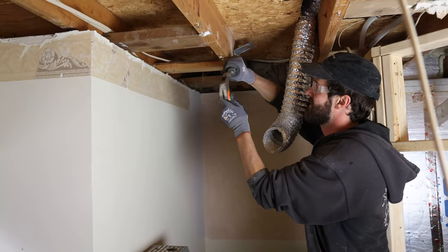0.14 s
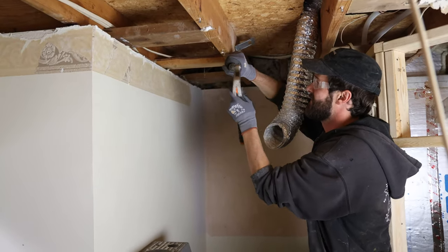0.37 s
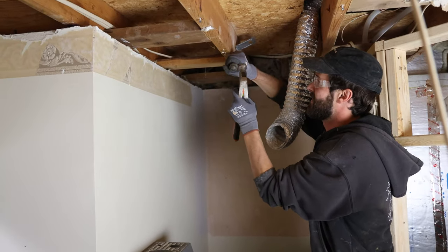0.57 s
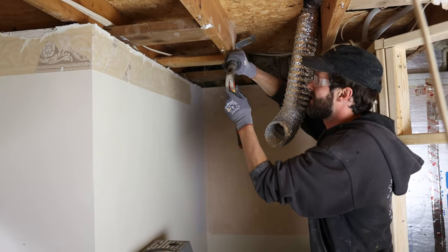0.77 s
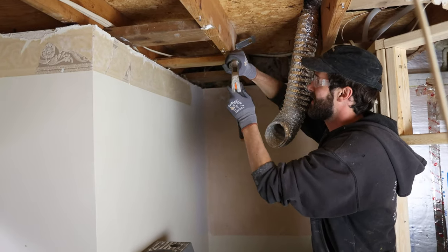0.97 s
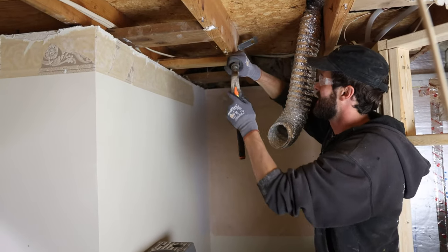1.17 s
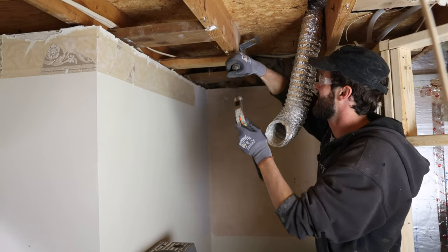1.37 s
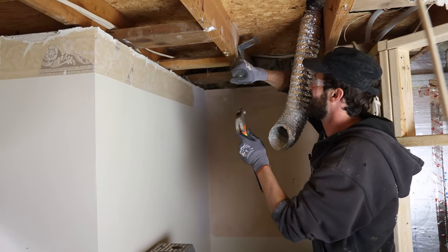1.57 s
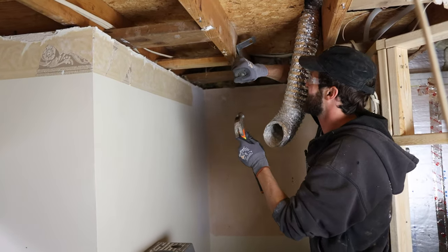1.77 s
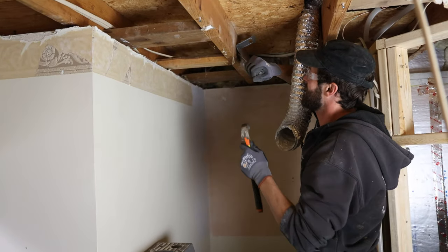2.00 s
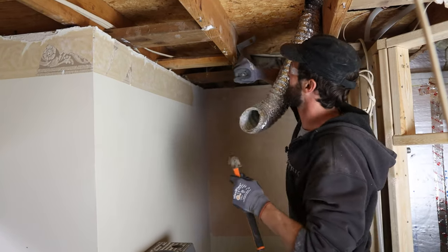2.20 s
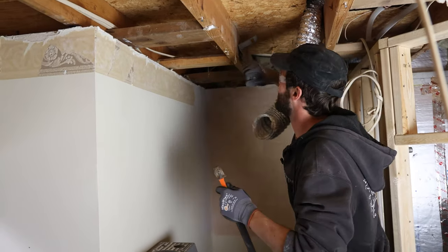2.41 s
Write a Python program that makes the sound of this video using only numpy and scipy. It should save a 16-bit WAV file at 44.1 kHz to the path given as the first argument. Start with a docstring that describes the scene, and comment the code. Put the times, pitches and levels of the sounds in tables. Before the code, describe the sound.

A hammer strikes a sheet metal housing in a small bare room. After the fading ring of an earlier hit, blows land at about 0.2, 0.5, 0.8 and 1.1 seconds, each a clattering crack with a wooden thump. A clear tone and faint low drone linger until damped near 1.8 seconds. From 1.6 to 2.4 seconds come soft knocks and light metal clicks, with a brief sleeve rustle around 2.1.

```python
"""A hammer strikes a sheet metal fan housing between ceiling joists, in a bare small room.
About three times a second a blow cracks, clatters through the sheet and thumps the joists;
one clear tone and a low drone ring on between blows. Then the hammering stops and the ring is damped.
Light clicks, soft knocks and a rustle follow as the hands come away."""
import sys
import numpy as np
from scipy import signal
from scipy.fft import rfft, irfft
from scipy.io import wavfile
from scipy.ndimage import uniform_filter1d

SR = 44100
rng = np.random.default_rng(int(sys.argv[2]) if len(sys.argv) > 2 else 0)


def store_pcm(level_fs):
    """Save levels as 16-bit WAV."""
    pcm = np.round(np.clip(level_fs, -1, 1) * 32767).astype(np.int16)
    wavfile.write(sys.argv[1], SR, np.atleast_2d(pcm).T)


N = 108045
BAND_HZ = np.geomspace(28, 18000, 24)[:, None]  # noise band centres, one a row
MODE_RISE_S, PARTIAL_RISE_S = .0024, .0043


def amp(db):
    """Decibels to gain."""
    return 10 ** (np.asarray(db) / 20)


def read(table, hz, column=1):
    """One column of a table, interpolated on a log-frequency axis."""
    points = np.array(table, float)
    return np.interp(np.log(hz), np.log(points[:, 0]), points[:, column])


def add(mix, start_s, sound):
    """Mixes a sound in, trimming what falls outside the mix."""
    at = round(start_s * SR)
    sound = sound[max(-at, 0):]
    part = mix[max(at, 0):][:len(sound)]
    part += sound[:len(part)]


def noise_bands(size):
    """White noise split into narrow bands of rms 1."""
    log_hz = np.log(np.fft.rfftfreq(size, 1 / SR) + 1)
    shares = np.array([np.interp(log_hz, np.log(BAND_HZ[:, 0]), row) for row in np.eye(len(BAND_HZ))])
    bands = irfft(rfft(rng.standard_normal(size)) * shares * (log_hz > np.log(20)), size)
    return bands / bands.std(1, keepdims=True)


def struck(t, rise, t60):
    """A quick attack and an exponential decay."""
    return (1 - np.exp(-(t / rise) ** 2)) * np.exp(-np.log(1000) * t / t60)


def shaped(bands, envelopes):
    """Sums the bands, each holding the energy of its envelope."""
    bursts = bands * envelopes
    trim = np.sqrt((envelopes ** 2).sum(1) / (bursts ** 2).sum(1))
    return (bursts * trim[:, None]).sum(0)


def ringing(modes, t, rise):
    """Decaying sines, all pushed the same way by one impact; close ones beat."""
    return sum(amp(db) * struck(t, rise, t60) * np.sin(2 * np.pi * hz * t) for hz, db, t60 in modes)


# bed of quiet air (frequency [Hz], level [dB])
ROOM_BED = [(30, -87), (65, -71.5), (130, -78), (250, -78.5), (500, -74), (1300, -76.5), (2500, -81.5),
            (6000, -85), (15000, -91.5)]
def room_tone():
    """Steady faint air of the room."""
    return (noise_bands(N) * amp(read(ROOM_BED, BAND_HZ))).sum(0)


# swell of the sliding cloth (time [s], level [dB])
RUSTLE_FADER = [(0, -92), (1.87, -87), (1.94, -79), (2.03, -57), (2.09, -56.5), (2.15, -65.5),
                (2.249, -73.5), (2.45, -73.5)]
# its tone colour (frequency [Hz], relative level [dB])
RUSTLE_EQ = [(100, -27), (500, -12.5), (1150, -3.5), (2200, -10.5), (4000, 3), (7500, -2), (10500, 3),
             (15000, 9)]
def rustle(grain_db=1.5):
    """Sleeve and glove slide with a grainy hiss."""
    hiss = (noise_bands(N) * amp(read(RUSTLE_EQ, BAND_HZ))).sum(0)
    grain = uniform_filter1d(rng.standard_normal(N), size=300)
    fader_db = np.interp(np.arange(N) / SR, *np.transpose(RUSTLE_FADER))
    return hiss / hiss.std() * amp(fader_db + grain_db * grain / grain.std())


# knock cues (time [s], level [dB], centre [Hz], t60 [s])
KNOCK_CUES = [(1.632, -57.5, 380, 0.22), (1.672, -57, 365, 0.11), (1.76, -56, 372, 0.053),
              (1.91, -56, 420, 0.083), (2.155, -62, 1405, 0.17), (2.266, -56, 1060, 0.051),
              (2.283, -49, 716, 0.096), (2.291, -56.5, 152, 0.12), (2.372, -56.5, 520, 0.11)]
def knocks(rise_s=.0049, slope_db_per_octave=11.5, tone_db=3):
    """Hand and tool bump softly: a hollow tone inside a dull puff of noise."""
    out, t = np.zeros(N), np.arange(SR // 2) / SR
    for start, db, centre, t60 in KNOCK_CUES:
        colour = amp(db - slope_db_per_octave * abs(np.log2(BAND_HZ / centre)))
        hollow = ringing([(centre, db + tone_db, t60)], t, rise_s)
        puff = shaped(noise_bands(len(t)), colour * struck(t, rise_s, t60))
        add(out, start, hollow + puff)
    return out


# click cues (time [s], level [dB], t60 [s], treble shelf [dB], ring send [dB])
CLICK_CUES = [(1.680, -43, 0.074, -16.5, -24), (2.0972, -42, 0.052, 6, -1), (2.287, -57.5, 0.071, -12, -4),
              (2.446, -49.5, 0.051, -23, -14)]
# their tone colour (frequency [Hz], relative level [dB])
CLICK_EQ = [(35, -45), (80, -4), (200, -46), (600, -15), (1600, -13.5), (2300, -17), (4200, -10),
            (7000, -7), (10000, -4.5), (14500, 0)]
def clicks(ring_hz=1580, ring_t60=.09, shelf_hz=7340, tail_db=-18):
    """Small clicks of metal: a bright snap, a short ring and a faint tail."""
    out, t = np.zeros(N), np.arange(SR // 2) / SR
    shelf = BAND_HZ ** 2 / (BAND_HZ ** 2 + shelf_hz ** 2)
    for start, db, t60, treble_db, ring_db in CLICK_CUES:
        envelope = struck(t, rise=.0004, t60=t60) + amp(tail_db) * struck(t, rise=.0063, t60=.3)
        colour = amp(read(CLICK_EQ, BAND_HZ) + treble_db * shelf)
        snap = shaped(noise_bands(len(t)), colour * envelope)
        ring = ringing([(ring_hz, ring_db, ring_t60)], t, PARTIAL_RISE_S)
        add(out, start, amp(db) * (snap + ring))
    return out


# clear tone and low drone (frequency [Hz], relative level [dB], t60 [s])
SUSTAIN_MODES = [(520.5, -31, 1.3), (65, -53, 6), (129.3, -46, 2.1)]
def sustain(t, hold_s, sag=.014, release_s=.03):
    """Lightly damped modes sag a little in pitch and are choked after hold_s."""
    slowed = t - sag * t ** 3
    tones = sum(amp(db) * struck(t, rise=.018, t60=t60) * np.sin(2 * np.pi * hz * slowed)
                for hz, db, t60 in SUSTAIN_MODES)
    return tones * np.exp(-np.maximum(t - hold_s, 0) / release_s)


# body of the housing and its joists (frequency [Hz], relative level [dB], t60 [s])
HEAVY_MODES = [(54, -31, .38), (75.4, -29, .44), (107, -26, .2), (124, -24, .24), (145, -27, .2),
               (163, -21.5, .33), (273.5, -21, .22), (355, -26, .26), (381, -22, .2), (445, -24, .19),
               (610, -25, .22), (722, -24, .18), (1313, -28, .18), (1523, -31, .24)]
# quickly damped push into the joists (frequency [Hz], relative level [dB], t60 [s])
THUD_MODES = [(62, -17, .085), (120, -11, .075)]
# the thud and its weaker returns (delay [s], gain [dB])
THUD_TAPS = [(.002, -0.5), (0.063, -6.5), (.118, -16)]
def thump(t, body_lag_s=.003, body_db=1):
    """The weight of a blow: the joists throb and the heavy modes follow just behind the crack."""
    out = np.zeros(len(t))
    thud = ringing(THUD_MODES, t, rise=.005)
    for delay, db in THUD_TAPS:
        add(out, delay, amp(db) * thud)
    add(out, body_lag_s, amp(body_db) * ringing(HEAVY_MODES, t, MODE_RISE_S))
    return out


# voicing of the lesser sheet modes (frequency [Hz], relative level per mode [dB], t60 [s])
CROWD_VOICING = [(798.6, -35, 0.16), (1410, -35, .19), (1980, -37.5, 0.097), (4080, -45.5, 0.17),
                 (6000, -39, 0.12), (9000, -54.5, 0.15), (15050, -51, .1)]
def mode_crowd(pitches, t, spread_db=5, detune=.012):
    """Each blow lands elsewhere and bends the sheet, so lesser modes vary in level, sign and pitch."""
    strength, bend, side = np.clip(rng.standard_normal((len(pitches), 3)), -2, 2).T
    levels = read(CROWD_VOICING, pitches) + spread_db * strength
    modes = zip(pitches * (1 + detune * bend), levels, read(CROWD_VOICING, pitches, column=2))
    return sum(sign * ringing([mode], t, MODE_RISE_S) for sign, mode in zip(np.sign(side), modes))


# steely bite (frequency [Hz], relative level [dB], t60 [s])
CLANG_MODES = [(2309, -34, .17), (2393, -32, .17), (2920, -41, .4), (2975, -44, .33), (3093, -30, .23),
               (3626, -26, .12), (4590, -44, .25), (4880, -45, .3), (5292, -50, .28)]
# faint sheen on top (frequency [Hz], relative level [dB], t60 [s])
SHIMMER_MODES = [(8678, -52, .27), (9577, -55, .25)]
def clang(t, clang_db, shimmer_db):
    """The thin steel rings in separate high partials."""
    bite = amp(clang_db) * ringing(CLANG_MODES, t, PARTIAL_RISE_S)
    return bite + amp(shimmer_db) * ringing(SHIMMER_MODES, t, PARTIAL_RISE_S)


# sheet and room tail (frequency [Hz], sheet level [dB], sheet t60 [s], tail level [dB], tail t60 [s])
CLATTER_BANDS = [(28, -69.5, .1, -80.5, .4), (40, -60, .1, -63.5, .4), (57.8, -41.5, .1, -59.5, 0.51),
                 (125, -19.5, .1, -37, 0.16), (248, -26.5, 0.21, -38, 0.46), (352, -24, 0.19, -32, 0.39),
                 (681, -16.5, 0.089, -38, 0.37), (1200, -22.5, 0.13, -36, 0.34),
                 (2000, -31.5, 0.067, -37, 0.3), (3500, -17.5, 0.051, -46.5, 0.29),
                 (5370, -26.5, 0.028, -40.5, .24), (8000, -36.5, 0.06, -50, 0.17),
                 (15000, -36.5, 0.055, -43.5, .16)]
# attack of the sheet (frequency [Hz], rise [s])
CLATTER_ATTACK = [(100, .006), (350, .009), (700, .006), (1500, .004), (3200, .0022), (12000, .0017)]
# how alike the blows sound (frequency [Hz], shared power [0-1])
CLATTER_LIKENESS = [(100, 0.81), (600, 0.7), (2500, .75), (7000, 1)]
def clatter(t, shared_noise, treble_db, shelf_hz=2500):
    """The sheet's dense modes crack and clatter, much the same each blow; the room adds a tail."""
    sheet_db, sheet_t60, tail_db, tail_t60 = (read(CLATTER_BANDS, BAND_HZ, c) for c in (1, 2, 3, 4))
    rise = read(CLATTER_ATTACK, BAND_HZ)
    sheet = amp(sheet_db) * struck(t, rise, sheet_t60)
    tail = amp(tail_db) * struck(t, 2 * rise, tail_t60)
    alike = read(CLATTER_LIKENESS, BAND_HZ)
    bands = np.sqrt(alike) * shared_noise + np.sqrt(1 - alike) * noise_bands(len(t))
    shelf = amp(treble_db * BAND_HZ / (BAND_HZ + shelf_hz))
    return shaped(bands, np.hypot(sheet, tail) * shelf)


# hammer cues, the first already dying away as the scene opens
# (time [s], hit gain [dB], treble [dB], sustain gain [dB], clang send [dB], shimmer send [dB])
BLOW_CUES = [(-.105, -1.5, 1, -1, -12, 2), (0.2, 1.5, -1.5, 2.5, -4.5, 5), (0.5056, 0, 0, 0.5, 0, -11),
             (0.8222, 1, 1, 2, -2.5, -8.5), (1.1197, 1.5, 0, -1, 1, 2.5)]
def hammer(crowd_size=60, let_go_s=1.76):
    """Each blow fires all layers of the housing; the sustain holds until the next blow or the let-go."""
    out, t = np.zeros(N), np.arange(SR) / SR
    shared_noise = noise_bands(len(t))
    low_hz, high_hz = CROWD_VOICING[0][0], CROWD_VOICING[-1][0]
    scatter = (np.arange(crowd_size) + rng.random(crowd_size)) / crowd_size
    pitches = low_hz * (high_hz / low_hz) ** scatter
    ends = [cue[0] for cue in BLOW_CUES[1:]] + [let_go_s]
    for (start, db, treble_db, sustain_db, clang_db, shimmer_db), end in zip(BLOW_CUES, ends):
        hit = clatter(t, shared_noise, treble_db) + clang(t, clang_db, shimmer_db) + thump(t)
        add(out, start, amp(db) * hit)
        add(out, start, amp(db + treble_db) * mode_crowd(pitches, t[:SR // 2]))
        add(out, start, amp(sustain_db) * sustain(t, hold_s=end - start))
    return out


def scene():
    """All sources in one mono mix."""
    return (hammer() + clicks() + knocks() + rustle() + room_tone())[None]


def record(dry, low_cut_hz=54, ceiling=.8, high_cut_hz=16250):
    """The microphone's low cut, soft overload that rounds the peaks, then the band limit."""
    lean = signal.sosfilt(signal.butter(4, low_cut_hz, "high", fs=SR, output="sos"), dry)
    rounded = ceiling * np.tanh(lean / ceiling)
    high_cut = signal.firwin(255, high_cut_hz, window=("kaiser", 8), fs=SR)
    return signal.oaconvolve(rounded, high_cut[None], "same")


dry = scene()
out = record(dry)
store_pcm(out)
```